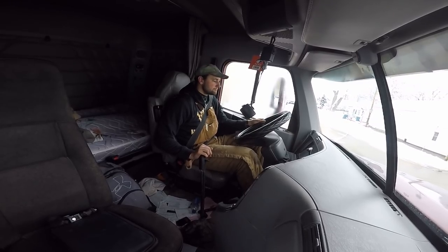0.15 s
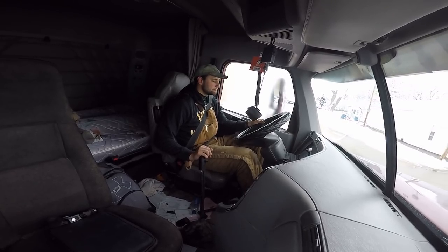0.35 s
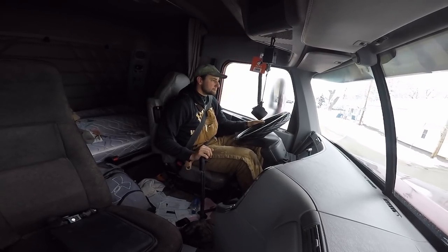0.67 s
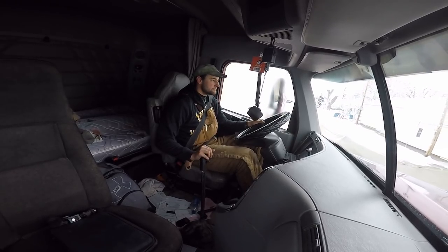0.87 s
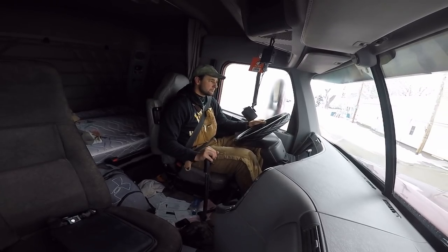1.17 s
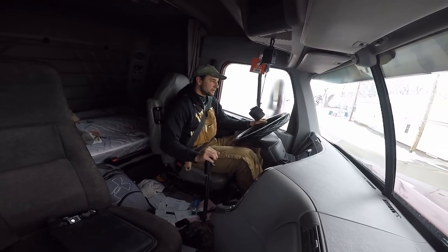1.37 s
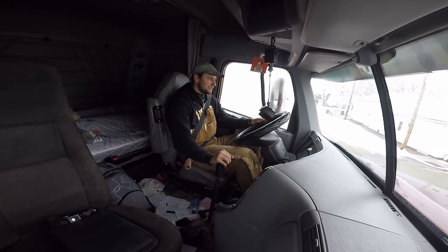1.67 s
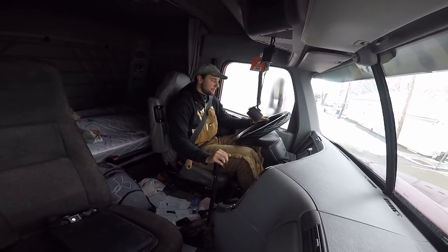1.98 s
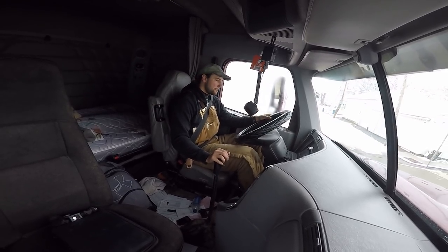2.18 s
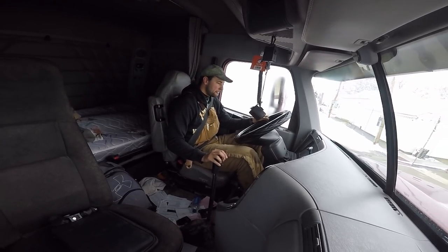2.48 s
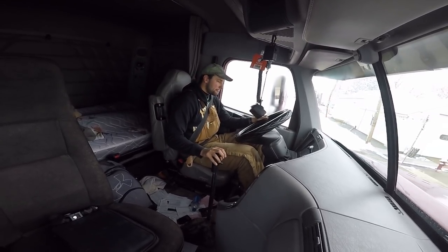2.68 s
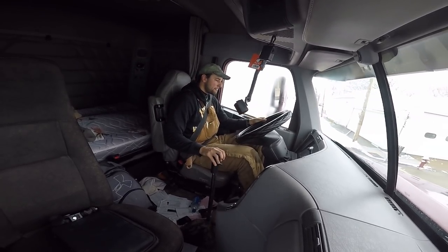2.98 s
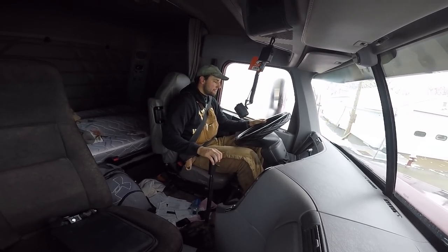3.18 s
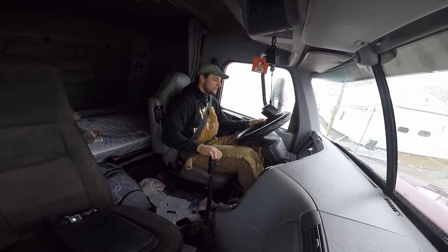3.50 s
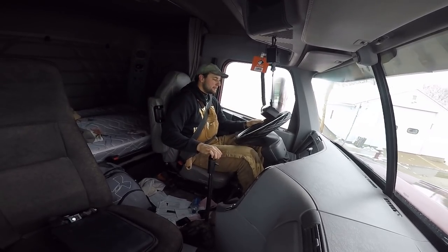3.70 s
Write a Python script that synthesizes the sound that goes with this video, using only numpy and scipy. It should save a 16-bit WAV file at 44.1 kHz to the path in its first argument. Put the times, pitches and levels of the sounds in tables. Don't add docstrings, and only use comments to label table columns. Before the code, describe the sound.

Loud diesel truck engine inside a cab, revs rising, falling, dipping and surging again

```python
import sys
import numpy as np
from scipy import signal
from scipy.fft import rfft, irfft, next_fast_len
from scipy.io import wavfile
from scipy.ndimage import uniform_filter1d

SR = 44100
rng = np.random.default_rng(int(sys.argv[2]) if len(sys.argv) > 2 else 0)


def to_linear_factor(level_db):
    exponent = np.asarray(level_db, float) / 20
    return 10 ** exponent


def persist_wave(psi):
    counts = np.round(np.clip(psi, -1, 1) * 32767).astype(np.int16)
    wavfile.write(sys.argv[1], SR, np.atleast_2d(counts).T)


N = 169785

# t/s, timing gear mesh f/Hz
MESH_SPEED = [(0, 1633), (.15, 1710), (.3, 1820), (.45, 1983), (.7, 2263), (.84, 2351), (.95, 2287),
              (1.15, 2055), (1.5, 1807), (1.82, 1642), (2.2, 1868), (2.5, 2242), (2.66, 2223), (2.95, 2107),
              (3.12, 2180), (3.52, 2617), (3.62, 2638), (3.85, 2370)]
# t/s, load level/dB, gear strain level/dB
ENGINE_LOAD = [(0, -29.5, 14), (.3, -31, 15.5), (.45, -37.5, -4), (.65, -42.5, -1.5), (.85, -42.5, -2),
               (1.05, -45.5, -0.5), (1.25, -44, 2), (1.75, -44.5, -4.5), (1.85, -36.5, -2),
               (2.18, -33, 1.5), (2.28, -36.5, 5.5), (2.38, -35, -4), (2.97, -39.5, 0.5), (3.4, -37, -3),
               (3.65, -39, -8), (3.85, -41, -2)]
# t/s, exhaust pulse level/dB, mount shake level/dB
EFFORT_DB = [(0, -0.5, -9), (.2, -0.4, -9), (.42, 0.5, -2.5), (.58, -3.5, -6.2), (.78, -4, 1),
             (.92, -2, -17), (1.1, -3.5, 6), (1.35, -5.5, -1.5), (1.65, -8, 1), (1.9, -4.5, -17),
             (2.15, 0, -6), (2.5, 0.5, 2.5), (2.75, 1.5, -1.5), (2.95, 2, -5.5), (3.15, -3, 2.5),
             (3.4, -5.5, -4), (3.85, -13.5, 5)]
# order/rev, level/dB, pulse share/1, shake share/1
CRANK_ORDERS = [(1, -21, 0.01, 1.6), (2, -30.5, .01, 0.53), (2.5, -29, .01, 2), (3, -18.5, 0.48, .01),
                (3.5, -31.5, .01, 2.5), (4, -32, .01, .01), (4.5, -23, 0.059, .01), (5.5, -30, 1.1, .01),
                (6, -17.5, 1.35, 0.0077), (7.5, -39.5, 0.16, .01), (9, -29, 2.2, .01), (12, -58, 2.1, .01)]
# start t/s, length t/s, order/rev, level/dB
ORDER_SURGES = [(0.099, .35, 3, 4), (0.248, 0.57, 9, 3.5), (.55, 1.35, 6, -3.5), (.55, .5, 4.5, -2.5),
                (1.279, 0.37, 4.5, 5), (1.696, 0.42, 4.5, -7), (2.696, 0.13, 4.5, 6),
                (2.883, 0.39, 4.5, -8), (3.246, 0.2, 4.5, 3), (3.497, 0.24, 4.5, -6), (3.701, .3, 4.5, 6),
                (3.25, .25, 3, 4), (3.65, 0.23, 3, 4.5), (3.602, 0.44, 1, -7.5)]
# f/Hz, width/Hz, level/dB
CAB_GAIN = [(25, 9.6, -0.5), (67, 4.8, -1.5), (83, 9, -7.5), (95.8, 16.8, 7.5), (117, 16, -0.5),
            (138.1, 10, 5), (162, 12, 1), (189, 5.5, -8.5), (235, 9, 4.5), (248, 8.7, -1), (305, 33, -12)]
# mesh multiple/1, level/dB, noise width/Hz, strain share/1, fuzz/1
GEAR_TONES = [(1, -52, 39, 1, .7), (1.277, -69, 18, .1, .4)]
# f/Hz, width/Hz, level/dB
DASH_GAIN = [(1980, 45, 6), (2330, 70, 3), (2940, 170, 15), (3350, 70, 10), (2480, 90, 3), (2130, 60, -4),
             (3100, 80, -5), (2620, 50, -4)]
# f/Hz, width/Hz, level/dB
BLOCK_RINGS = [(289.3, 95, 0.5), (595.4, 60, -8.5), (650.7, 51, -3.5), (759, 31, -5.5), (901.7, 59, -5),
               (975, 56, -6.5), (1280, 200, -11.5), (1630, 330, -8.5), (2303, 61, -19.5), (3873, 420, -14),
               (5300, 140, -31), (6410, 270, -23.5), (12800, 250, -51)]
# f/Hz, level/dB
ROAR_SPECTRUM = [(110, -22), (180, 0.5), (286, -5.5), (332, -11), (463, -16.5), (659, -17.5), (1820, -29),
                 (6200, -49), (15100, -75.5)]
# start t/s, length t/s, level/dB, octave level/dB
TRIM_SQUEAKS = [
    (1.307, .024, -41, -5),
    (1.340, .024, -42, -13),
    (2.318, .024, -52, 1),
    (3.495, .022, -45, -5),
    (3.520, .025, -44, -10),
]
# start t/s, length t/s, f/Hz, level/dB
PANEL_BUZZES = [(-.1, .42, 149.7, -16.5), (-0.8, 0.22, 90.3, -18.5), (0, .56, 744, -36.5),
                (-.05, 0.11, 863, -31), (0.1708, 0.28, 896, -41), (0.518, .4, 447.6, -40.5),
                (1.297, 0.74, 822, -52), (1.7761, .5, 595, -40.5), (1.8483, .4, 326.6, -32),
                (2, 0.38, 655, -41.5), (2.5, .3, 84, -17.5), (-.05, 0.22, 310, -28), (1.5, 0.34, 350, -36),
                (2, 0.2, 92, -20), (0.4, .03, 4200, -55), (0.7, 0.036, 2580, -52), (2.5, .07, 3900, -58),
                (3, .08, 4050, -56), (1.95, .12, 1180, -44)]
# f/Hz, width/Hz, level/dB, load share/1
AIR_MODES = [(62, 7, -28, .1), (91, 5, -27, .2), (149, 6, -29, .5), (215, 15, -34, .5), (310, 50, -38, .6),
             (455, 30, -49, -.2)]
# f/Hz, level/dB
TYRE_SPECTRUM = [(8.8, -28), (15, -9.5), (43, -15.5), (103, -2.5), (176, -11.5), (217, -13), (291, -31),
                 (332, -26.5), (500, -37), (650, -91), (1100, -120)]
# f/Hz, level/dB
WASH_SPECTRUM = [(180, -34.5), (300, -2), (483, -20), (578, -6), (1520, -24), (2080, -18.5), (3030, -29),
                 (6030, -32), (15100, -59.5)]
# t/s, level/dB
STEREO_WIDTH = [(0, -3.5), (.5, -4.5), (.7, -10), (.85, -15), (1.1, -24), (1.3, -31), (1.5, -64.5),
                (3.85, -65)]
# f/Hz, side over mid level/dB
PORT_SIDE = [(60, -10.5), (110, -11.5), (200, -12.5), (370, 1), (690, 6), (1270, 16), (2340, -5),
             (4320, -7.5), (7950, 10), (14600, -7)]
# f/Hz, width/Hz, level/dB
CROSS_MODES = [(310, 28, 10), (460, 41, -11), (820, 30, 3.5), (930, 36, 9), (1120, 67, -10),
               (1300, 70, 2.5), (1560, 60, -12)]
# f/Hz, level/dB
MIDDLE_TINT = [(10, 0.2), (330, 0), (500, -8), (800, -3), (1700, 3), (2300, -6.5), (4800, -2.5),
               (7200, 1.5), (10000, 3.4), (11300, -30.5)]
# f/Hz, width/Hz, level/dB
MIDDLE_RINGS = [(750, 18, 4), (880, 30, 2), (1290, 40, 4), (3900, 200, -4), (6800, 500, 4)]


def evened(x):
    return x / np.sqrt(np.mean(x ** 2) + 1e-20)


def curve(points, axis=1):
    p = np.array(points)
    return uniform_filter1d(np.interp(np.arange(N) / SR, p[:, 0], p[:, axis]), size=1500)


def swell(start_s, length_s):
    u = np.clip((np.arange(N) / SR - start_s) / length_s, 0, 1)
    return np.sin(np.pi * u) ** .5


def drift(per_s):
    hz = np.fft.rfftfreq(4096, 64 / SR)
    slow = irfft(rfft(rng.standard_normal(4096)) / (1 + (hz / per_s) ** 4))
    return evened(np.interp(np.arange(N) / 64, np.arange(4096), slow))


def lift(hz, peaks):
    return sum(db / (1 + ((hz - f) / width) ** 2) for f, width, db in peaks)


def colour(x, points, turn=1, peaks=((1, 1, 0),)):
    f, value = np.transpose(points)
    n = next_fast_len(N + 4096)
    x = np.pad(x, 2048, "reflect")
    hz = np.fft.rfftfreq(n, 1 / SR)
    db = np.interp(np.log(hz + 1), np.log(f + 1), value, -90, -90) + lift(hz, peaks)
    return irfft(rfft(x, n) * turn * to_linear_factor(db), n)[2048:][:N]


def resonate(x, hz, width_hz):
    turn = np.exp(2j * np.pi * np.cumsum(hz * np.ones(N)) / SR)
    r = np.exp(-np.pi * width_hz / SR)
    return 2 * (turn * signal.lfilter([1 - r], [1, -r], x / turn)).real


def ring(x, hz, width_hz):
    pole = np.exp((2j * hz - width_hz) * np.pi / SR)
    return evened(signal.lfilter([1], [1, -2 * pole, pole ** 2], x).real)


def boom(crank_hz):
    waver_db, waver_per_s = 1.5, 4.
    turns, out = np.cumsum(crank_hz) / SR, np.zeros(N)
    pulse_db, shake_db = curve(EFFORT_DB), curve(EFFORT_DB, axis=2)
    for k, db, pulse, shake in CRANK_ORDERS:
        level_db = db + lift(k * crank_hz, CAB_GAIN) + pulse * pulse_db + shake * shake_db
        level_db = level_db + waver_db * drift(waver_per_s)
        for start_s, length_s, order, surge_db in ORDER_SURGES:
            if order == k:
                level_db = level_db + surge_db * swell(start_s, length_s)
        phase = k * turns + rng.random() + .04 * drift(4.6)
        out += np.sqrt(2) * to_linear_factor(level_db) * np.cos(2 * np.pi * phase)
    return out


def whine(mesh_hz):
    flutter_db, flutter_per_s = 2., 26.
    strain_db, out = curve(ENGINE_LOAD, axis=2), np.zeros(N)
    for k, db, width_hz, share, blur in GEAR_TONES:
        tone_hz = k * mesh_hz
        fuzz = resonate(rng.standard_normal(N), tone_hz, width_hz)
        fuzz = evened(resonate(fuzz, tone_hz, width_hz))
        steady = np.sin(2 * np.pi * np.cumsum(tone_hz) / SR)
        level_db = db + lift(tone_hz, DASH_GAIN) + share * strain_db + flutter_db * drift(flutter_per_s)
        out += to_linear_factor(level_db) * (blur * fuzz + steady)
    return out


def clatter(crank_hz, load_db):
    block_db, roar_db, rattle_db = -41, -29.5, 1.6
    gate_depth, gate_decay_cycles = 0.14, 0.2
    injector_hz, injector_share, injector_calm = 3000, .75, .35
    firing = 3 * np.cumsum(crank_hz) / SR
    gate = 1 - gate_depth + gate_depth * 2 * np.exp(-(firing % 1) / gate_decay_cycles)
    puffs = gate * rng.standard_normal((2, N))
    injector_db = injector_share * curve(EFFORT_DB) - injector_calm * load_db
    rings = np.zeros(N)
    for f, width_hz, db in BLOCK_RINGS:
        level_db = db + rattle_db * drift(12.0) + (f > injector_hz) * injector_db
        rings += to_linear_factor(level_db) * ring(puffs[0], f, 1.17 * width_hz)
    roar = evened(colour(puffs[1], ROAR_SPECTRUM))
    return to_linear_factor(load_db) * (to_linear_factor(block_db) * rings + to_linear_factor(roar_db) * roar)


def squeaks():
    squeak_hz, third_db = 2290, -15
    t, out = np.arange(N) / SR, np.zeros(N)
    slip_turns, throb_db = .05 * drift(200.), 2.5 * drift(150.)
    for start_s, length_s, db, octave_db in TRIM_SQUEAKS:
        u = np.clip((t - start_s) / length_s, 0, 1)
        shape = np.clip(np.minimum(u / 0.06, (1 - u) / 0.075), 0, 1)
        for k, tone_db in enumerate((0, octave_db, third_db + octave_db / 2)):
            phase = (k + 1) * squeak_hz * t + (k + 1) ** 1.1 * slip_turns
            out += shape * to_linear_factor(db + tone_db + k * throb_db) * np.sin(2 * np.pi * phase)
    return out


def buzzes():
    wander, waver_db = .012, 2.
    out = np.zeros(N)
    for start_s, length_s, hz, db in PANEL_BUZZES:
        turns = np.cumsum(hz * (1 + wander * drift(8.84))) / SR + rng.random()
        level = np.sqrt(2) * to_linear_factor(db + waver_db * drift(9.5))
        out += swell(start_s, length_s) * level * np.cos(2 * np.pi * turns)
    return out


def drones(load_db):
    shake = rng.standard_normal(N)
    return sum(to_linear_factor(db + share * load_db) * ring(shake, f, width) for f, width, db, share in AIR_MODES)


def road(load_db):
    rumble_db = -16.5 + 0.28 * drift(0.83)
    wash_db = -40 + 0.26 * load_db + 0.65 * drift(25.0)
    rumble = evened(colour(rng.standard_normal(N), TYRE_SPECTRUM))
    wash = evened(colour(rng.standard_normal(N), WASH_SPECTRUM))
    return rumble * to_linear_factor(rumble_db) + wash * to_linear_factor(wash_db)


def cab_sound():
    full_load_db, gear_teeth = -38, 82.
    mesh_hz, load_db = curve(MESH_SPEED), curve(ENGINE_LOAD) - full_load_db
    crank_hz = mesh_hz / gear_teeth
    engine = boom(crank_hz) + whine(mesh_hz) + clatter(crank_hz, load_db)
    return engine + drones(load_db) + road(load_db)


def scene():
    port_like = 0.23
    mid = cab_sound() + squeaks() + buzzes()
    other, wide = cab_sound(), to_linear_factor(curve(STEREO_WIDTH))
    mixed = port_like * mid + np.sqrt(1 - port_like ** 2) * other
    side = wide * colour(mixed, [(12, -20.5)] + PORT_SIDE, 1j, CROSS_MODES)
    tinted = colour(mid, MIDDLE_TINT, 0.88, MIDDLE_RINGS)
    mid = mid + np.minimum(1.27 * wide, 1) * (tinted - mid)
    return np.array([mid + side, mid - side])


def low_pass(x):
    return signal.sosfilt(signal.butter(12, 15240, fs=SR, output="sos"), x)


def record(dry):
    hiss_db, hiss_hz, ceiling = -72, 9500, .95
    edge_s, edge_gain = .004, .35
    high_pass = signal.butter(4, hiss_hz, "high", fs=SR, output="sos")
    hiss = signal.sosfilt(high_pass, rng.standard_normal(dry.shape))
    hiss = hiss * to_linear_factor(hiss_db) * (1 - np.minimum(to_linear_factor(4 * curve(STEREO_WIDTH) + 6.0), .99))
    edge = np.clip(np.minimum(np.arange(N), np.arange(N)[::-1]) / (edge_s * SR), 0, 1)
    eased = edge_gain + (1 - edge_gain) * np.sin(edge * np.pi / 2) ** 2
    return low_pass(eased * ceiling * np.tanh(dry / ceiling) + hiss)


dry = scene()
out = record(dry)
persist_wave(out)
```